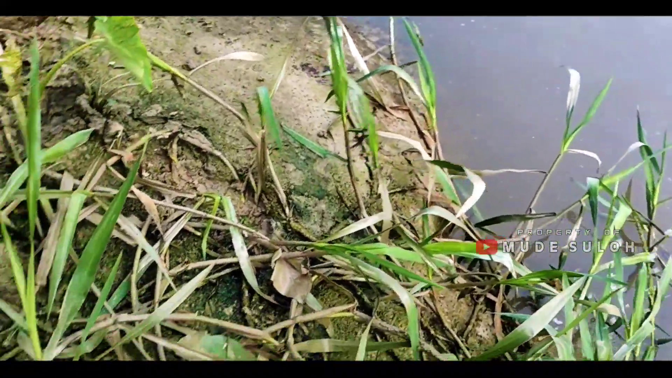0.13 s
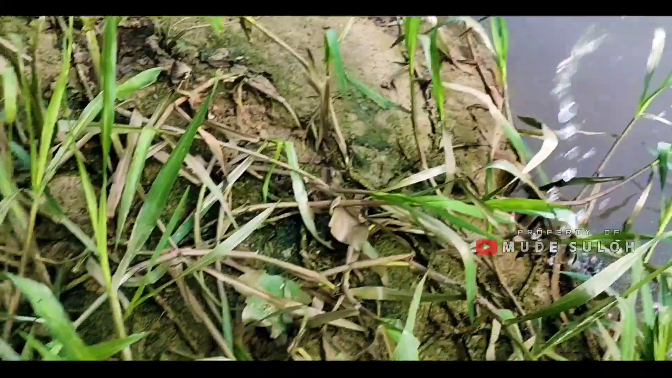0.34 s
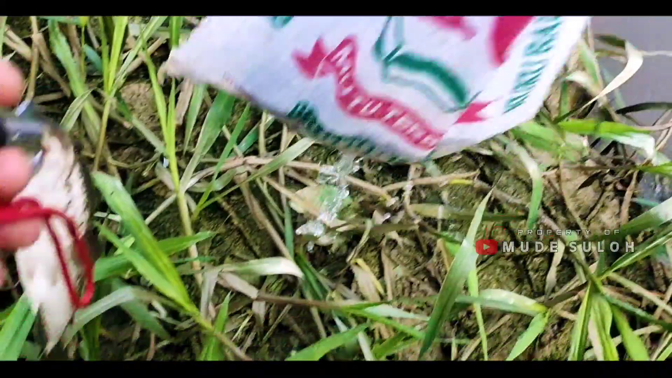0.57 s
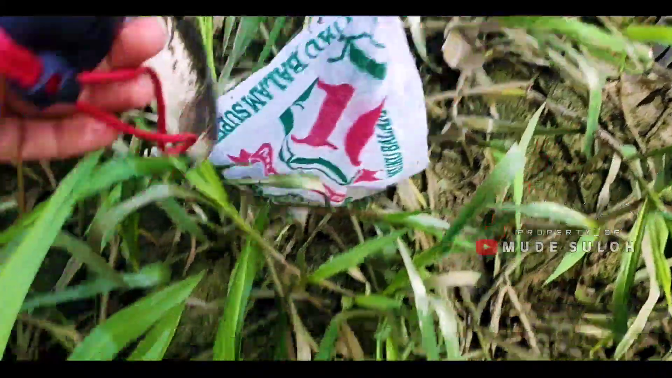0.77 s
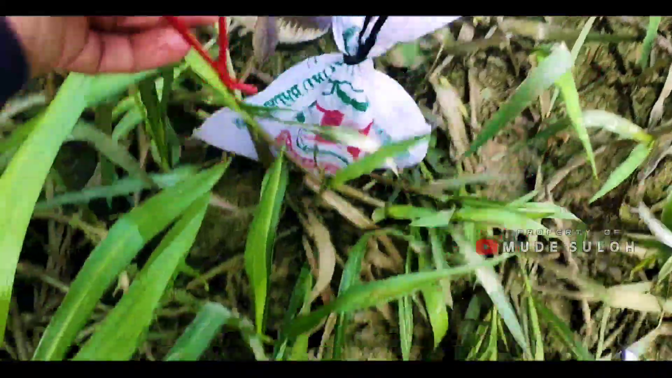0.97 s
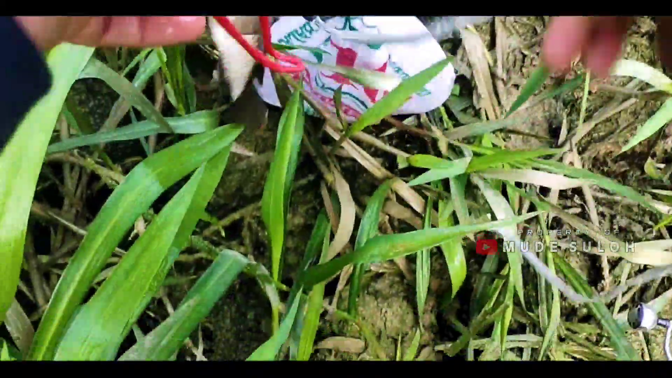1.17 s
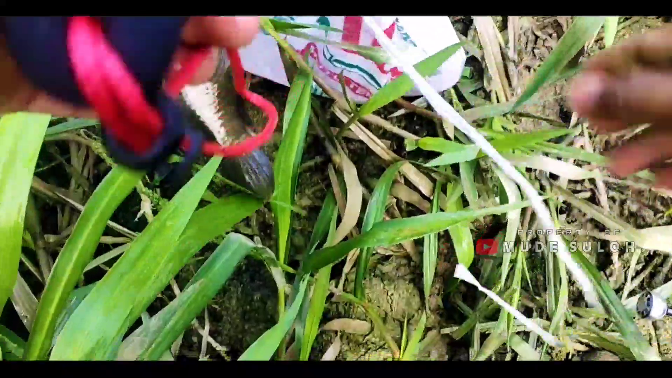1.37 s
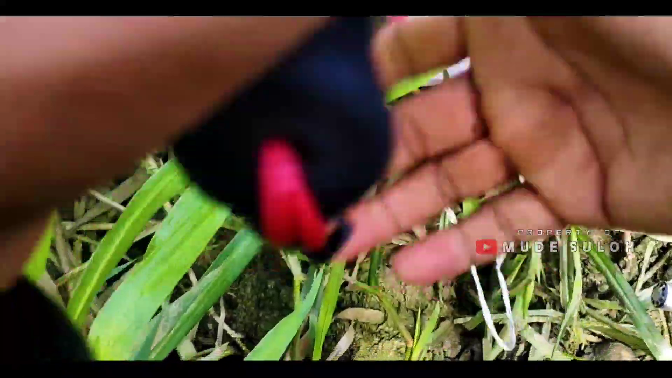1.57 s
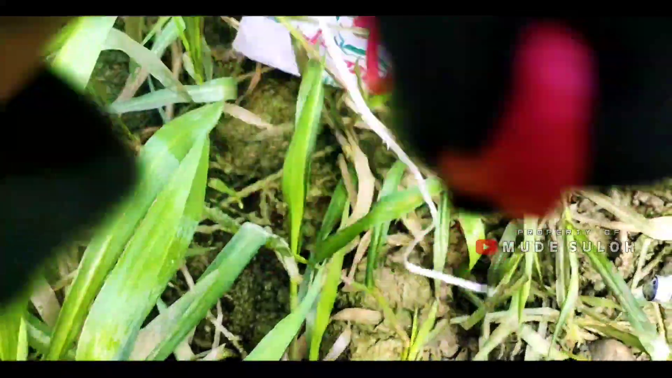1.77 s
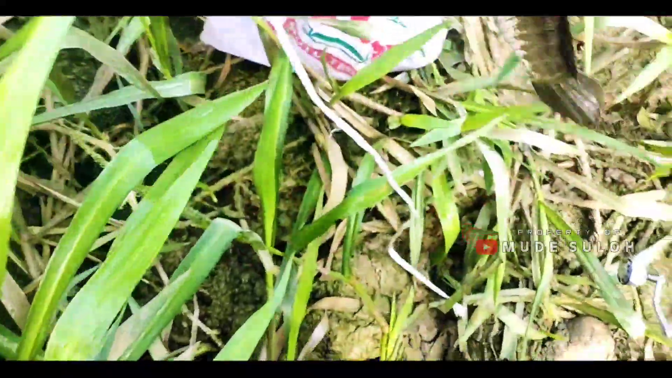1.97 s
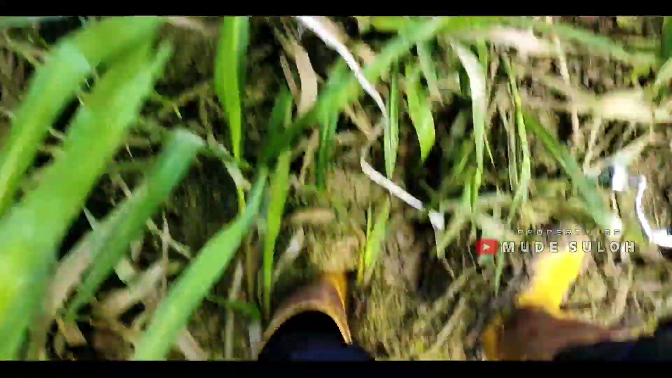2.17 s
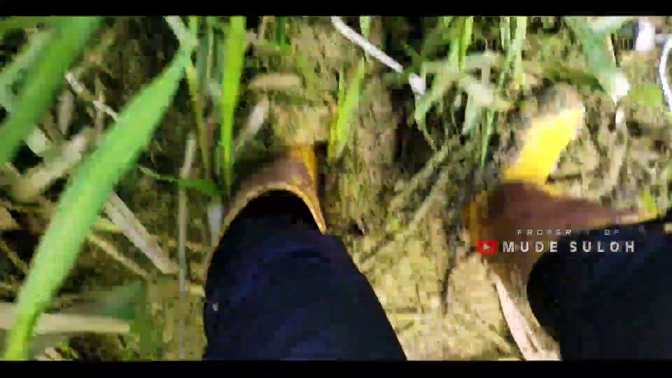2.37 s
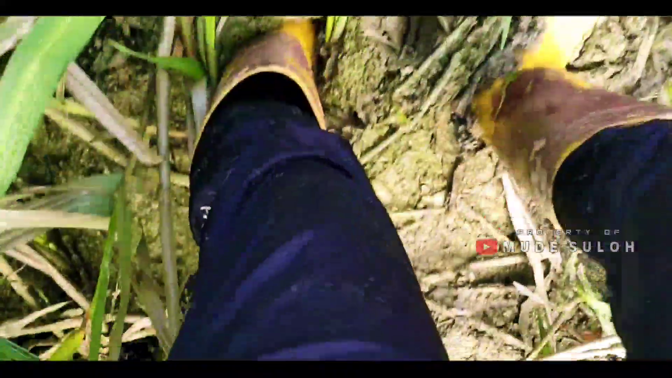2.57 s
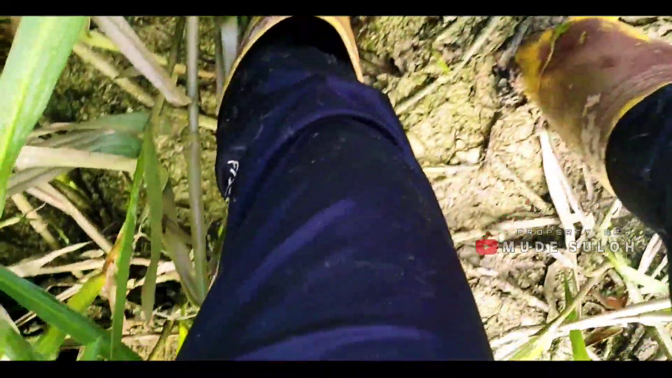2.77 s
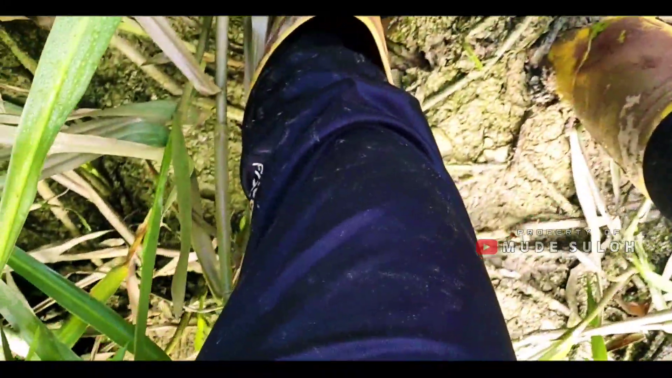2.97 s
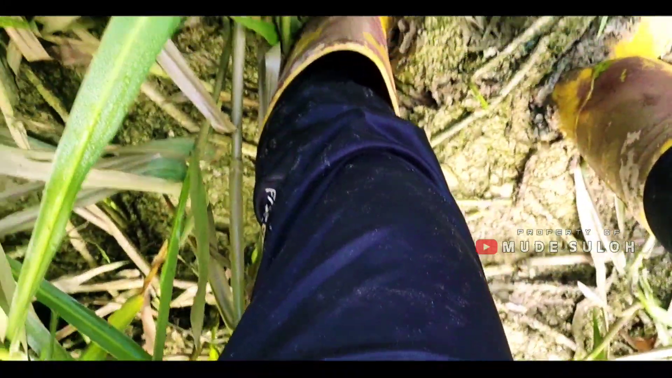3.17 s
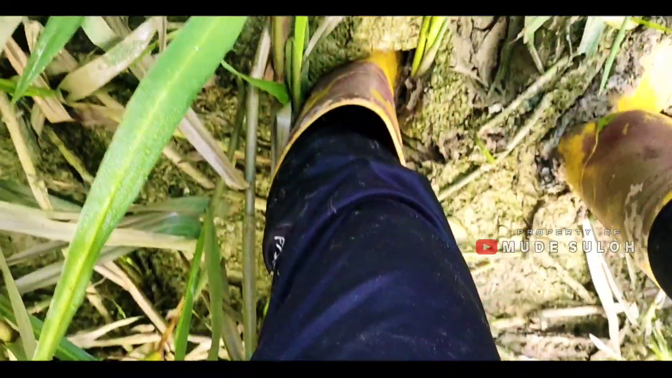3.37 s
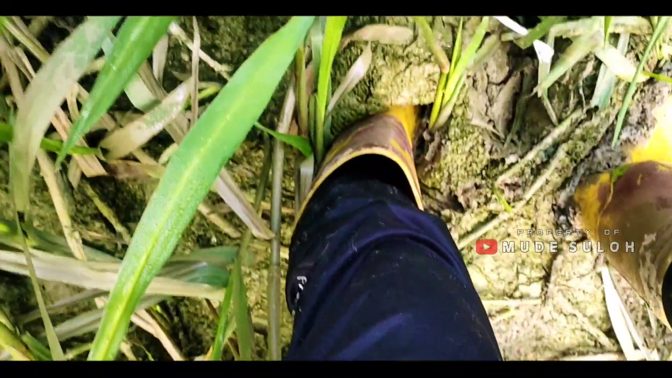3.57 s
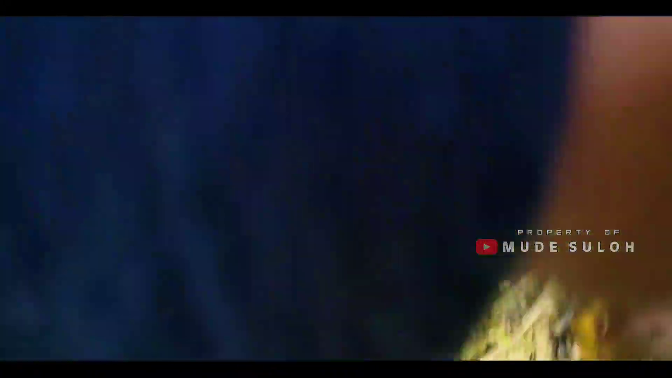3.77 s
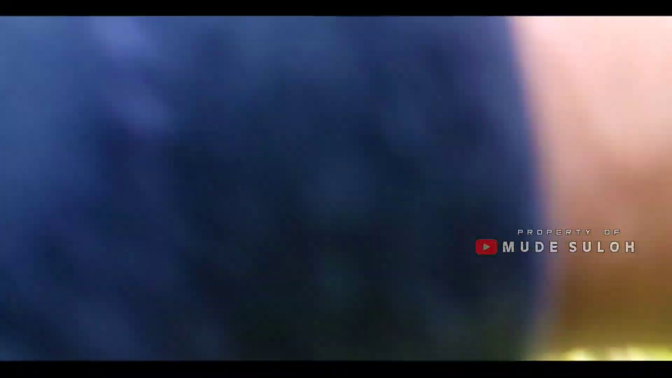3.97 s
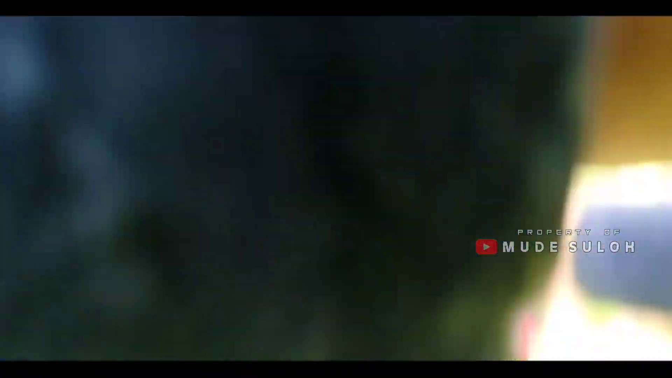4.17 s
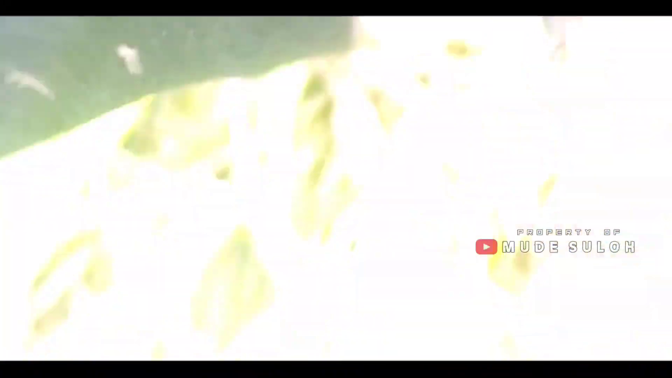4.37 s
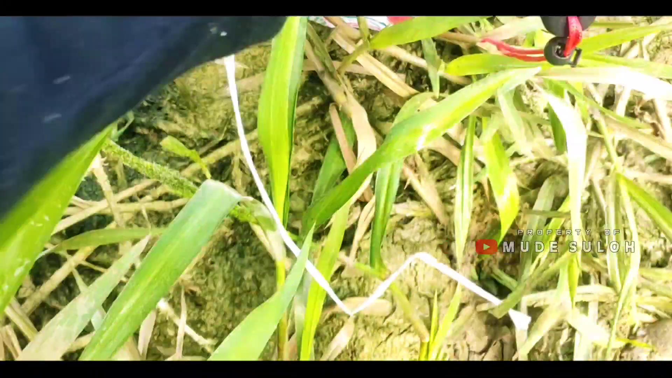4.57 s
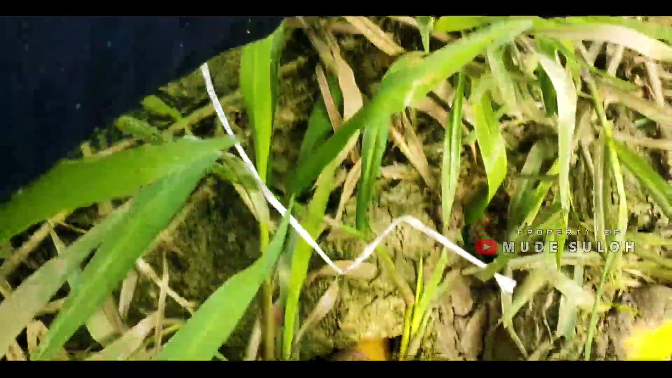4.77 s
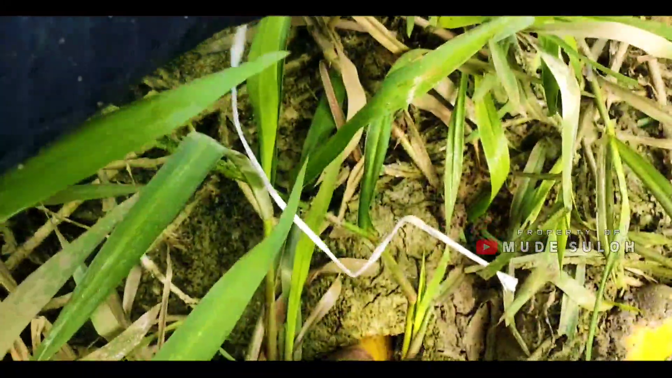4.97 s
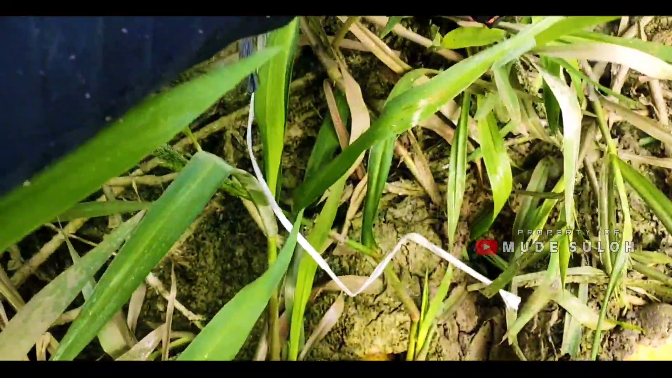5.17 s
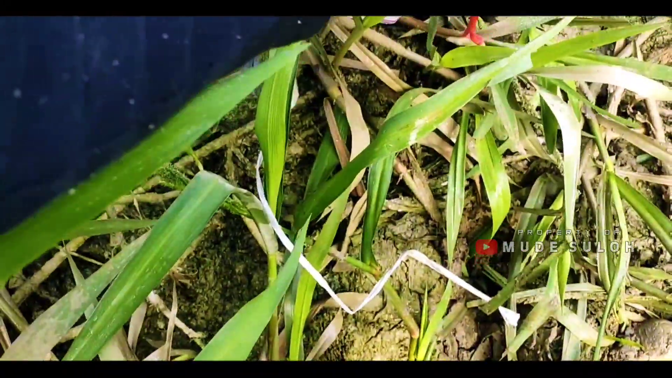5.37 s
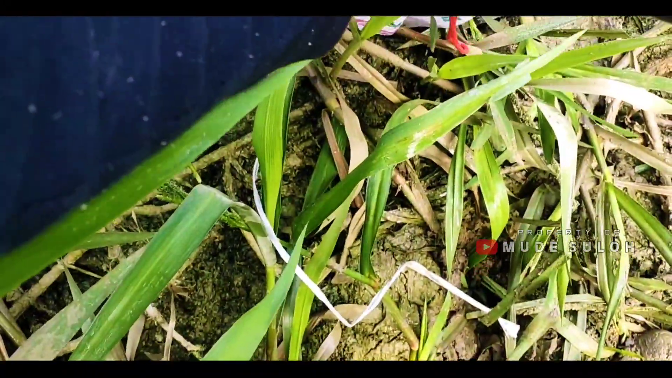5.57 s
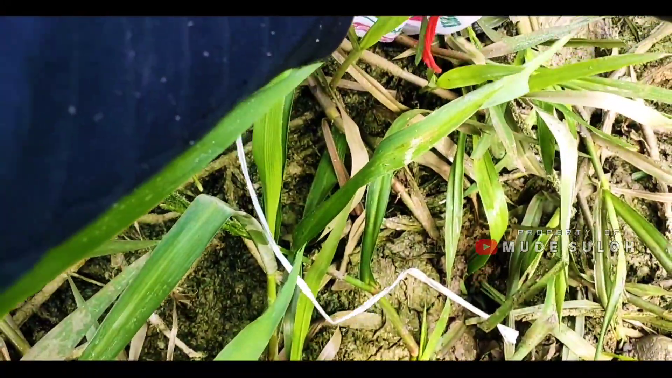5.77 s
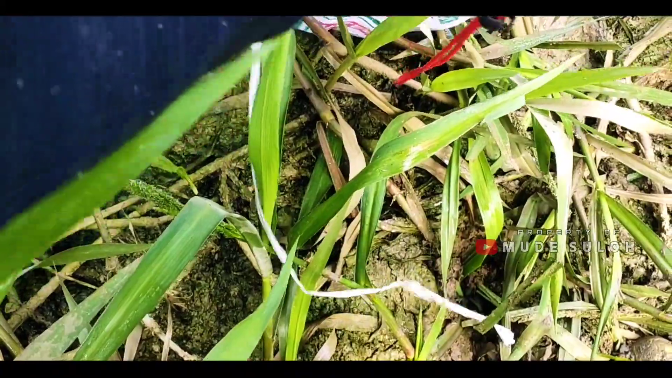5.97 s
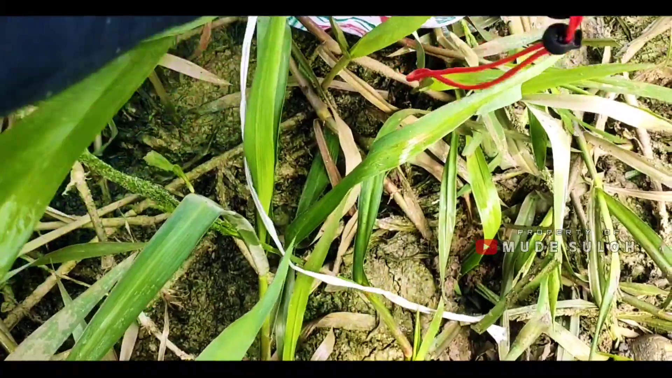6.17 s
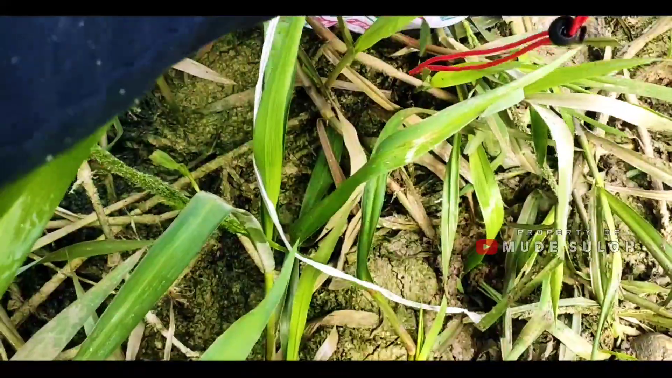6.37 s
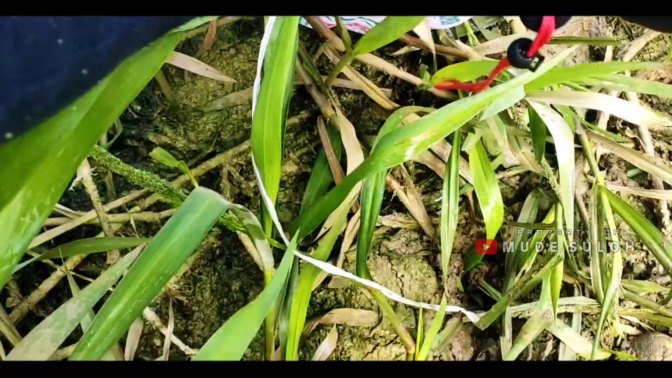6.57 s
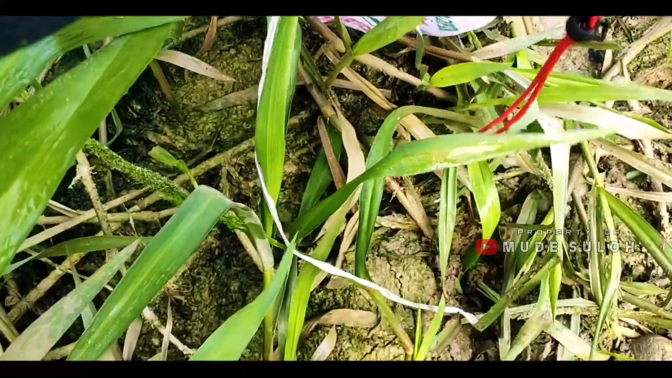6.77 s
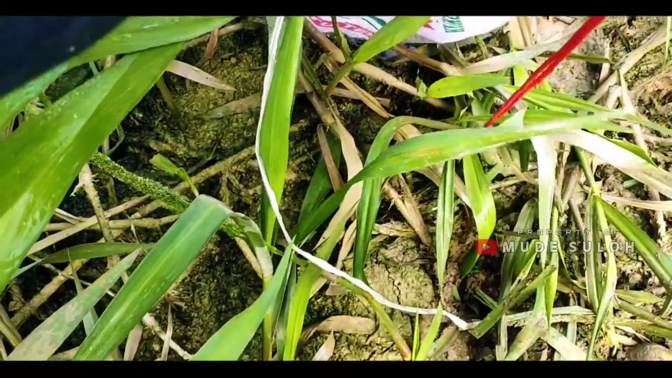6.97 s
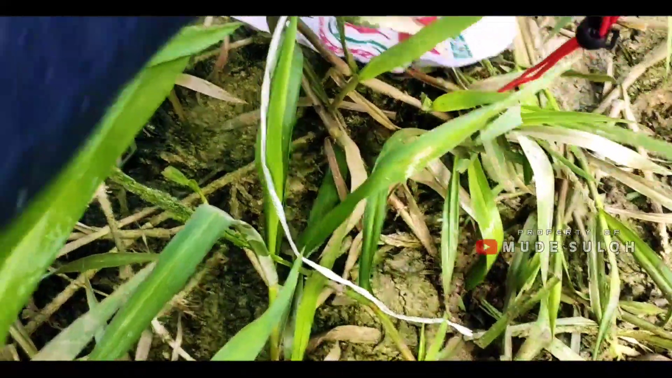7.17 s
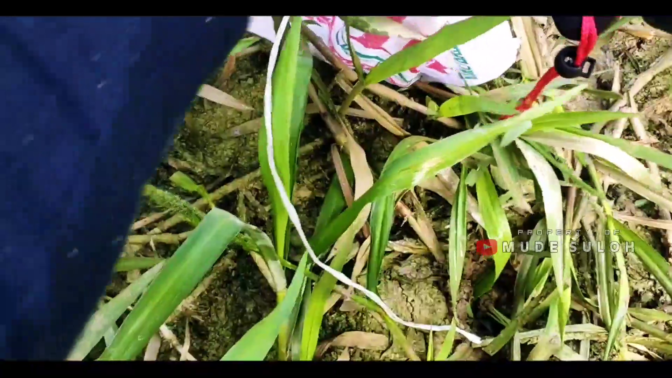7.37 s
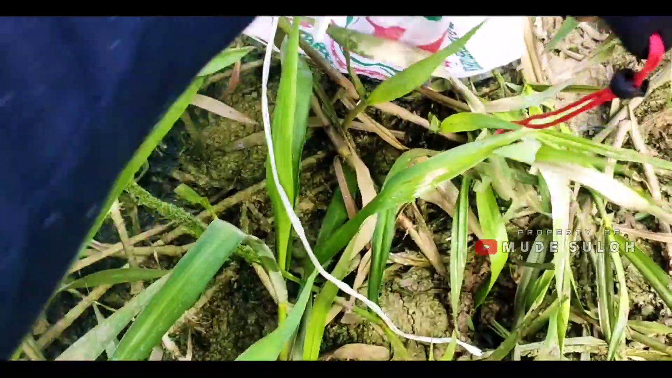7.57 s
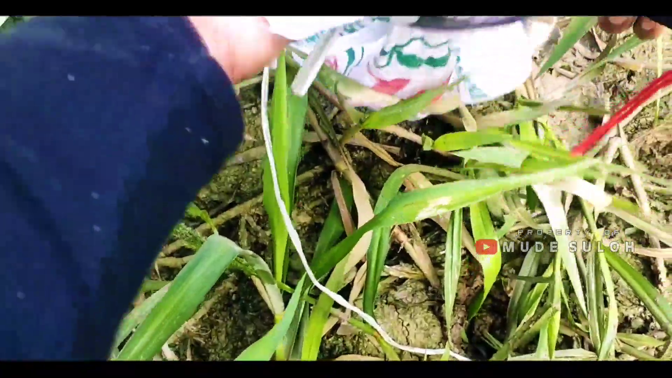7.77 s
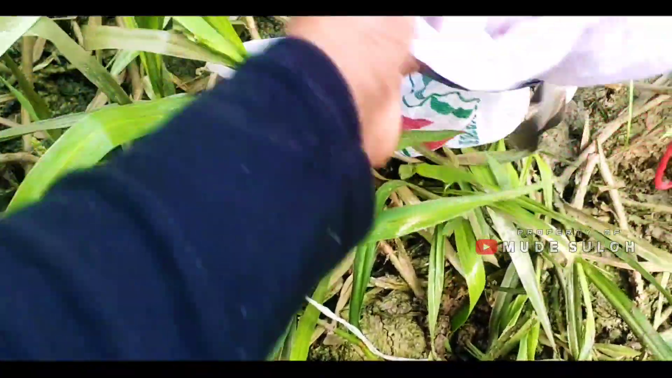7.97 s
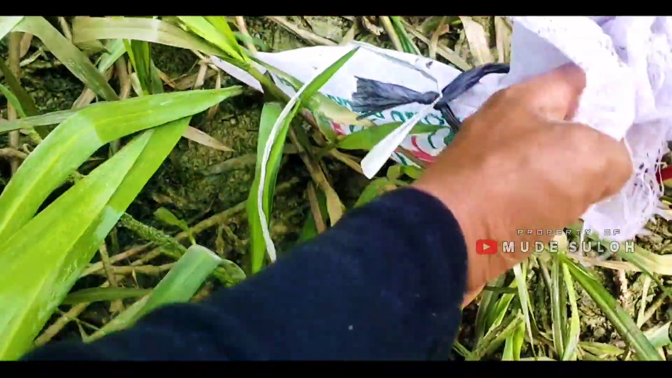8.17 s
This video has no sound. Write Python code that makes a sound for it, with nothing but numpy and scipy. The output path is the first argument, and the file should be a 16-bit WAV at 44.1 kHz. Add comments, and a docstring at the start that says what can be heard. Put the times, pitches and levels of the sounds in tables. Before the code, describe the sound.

Very close to the microphone, a stiff plastic sack crinkles and snaps sharply for the first second, then falls nearly quiet. Rustling grass, rubbing clothes and dull boot knocks follow in bursts, with twigs snapping, ending in a stronger scrape of sleeve and plastic. Behind, outdoors on a riverbank, a shrill insect drone holds steady, a bird gives short falling chirps, and a distant engine hums faintly.

```python
"""Close handling of a woven plastic sack and dry stalks: bursts of tiny slips make the crinkle and crackle.
Breaking fibres snap and ring, sleeves rub and swish as filtered noise, a line squeaks as gliding tones,
boots and gear knock as damped modes, and one puff of air flutters low.
Behind, insects drone and buzz as noise bands, birds chirp and whistle as gliding tones with echoes,
and a far engine hums as slowly wavering lines over a low noise rumble."""
import sys
import numpy as np
from scipy import signal
from scipy.fft import rfft, irfft, next_fast_len
from scipy.io import wavfile
from scipy.ndimage import uniform_filter1d

SR = 44100
rng = np.random.default_rng(int(sys.argv[2]) if len(sys.argv) > 2 else 0)


def pcm_store(signal):
    """Save signal as 16-bit PCM."""
    levels = np.round(np.clip(np.atleast_2d(signal), -1, 1) * 32767)
    wavfile.write(sys.argv[1], SR, levels.astype(np.int16).T)


N = 362943
TIME = np.arange(N) / SR
SACK_DOWN_S = 1.3  # until then the sack is carried and snaps; later the stalks snap


def from_db(db):
    """Decibels to amplitude gain: twenty decibels are a factor of ten."""
    return 10 ** (np.asarray(db) / 20)


def rms_one(x):
    """Normalisation to unit mean power."""
    return x / np.sqrt(np.mean(x ** 2) + 1e-20)


def in_time(rows, t=TIME):
    """Linear interpolation of each column against the first, which is time."""
    times_s, *columns = np.transpose(rows)
    return [np.interp(t, times_s, column) for column in columns]


def add(track, start_s, sound):
    """Superposition of a short sound on a track."""
    i = max(0, int(start_s * SR))
    track[i:i + len(sound)] += sound[:max(0, N - i)]


def colour(x, spectrum):
    """Minimum-phase filtering: a causal response to the given spectrum that keeps the power of white noise."""
    size = next_fast_len(len(x) + SR // 10, real=True) // 2 * 2
    hz, db = np.transpose(spectrum)
    bins_hz = np.arange(size // 2 + 1) * SR / size
    gain = rms_one(from_db(np.interp(np.log(bins_hz + 1), np.log(hz), db)))
    # folding the cepstrum onto positive times makes the phase minimal
    cepstrum = irfft(np.log(gain))
    cepstrum[1:size // 2] *= 2
    cepstrum[size // 2 + 1:] = 0
    return irfft(rfft(x, size) * np.exp(rfft(cepstrum)))[:len(x)]


def drift(rate_hz):
    """Low-passed noise: a smooth random course of unit power."""
    step = 40  # samples between computed points
    r = np.exp(-2 * np.pi * step * rate_hz / SR)
    warm_up = 2000
    noise = rng.standard_normal(N // step + 2 + warm_up)
    slow = signal.lfilter([1], [1, -2 * r, r * r], noise)[warm_up:]
    return np.interp(np.arange(N) / step, np.arange(len(slow)), rms_one(slow))


def ring(x, hz, t60_s):
    """Damped resonance: one mode that falls by 60 dB in the given time."""
    r = from_db(-60 / (t60_s * SR))
    w = 2 * np.pi * hz / SR
    return signal.lfilter([1, 0, -1], [1, -2 * r * np.cos(w), r * r], x)


def envelope(start_s, length_s, attack_s, release_s):
    """Linear rise, hold to the end of the length, then exponential decay."""
    since = TIME - start_s
    return np.clip(since / attack_s, 0, 1) * np.exp(-np.clip((since - length_s) / release_s, 0, 20))


def wander(x, depth_db, width_hz, hold_s, size=1024):
    """Random time-frequency modulation: narrow spectral patches come and go."""
    spectra = signal.stft(x, nperseg=size)[2]
    patches = rng.standard_normal(spectra.shape)
    # smooth along frequency, then along time
    for axis, steps in enumerate([width_hz * size / SR, 2 * hold_s * SR / size]):
        r = np.exp(-1 / steps)
        patches = signal.filtfilt([1 - r], [1, -r], patches, axis=axis, padtype="even")
    gain = rms_one(from_db(depth_db * np.clip(rms_one(patches), -2, 1.5)))
    return signal.istft(spectra * gain, nperseg=size)[1][:N]


def glides(rows, waver=0.007):
    """Frequency-modulated tones that swell and fade while their pitch slides unevenly."""
    out = np.zeros(N)
    wobble = 1 + waver * drift(39)
    for s, length_s, start_hz, end_hz, db in rows:
        count = int(length_s * SR)
        pitch = np.linspace(start_hz, end_hz, count) * wobble[int(s * SR):][:count]
        tone = np.sin(2 * np.pi * np.cumsum(pitch) / SR)
        add(out, s, from_db(db) * np.hanning(count) * tone)
    return out


def noise_band(hz, half_width_hz):
    """Quadrature modulation: low-passed noise shifted to a moving centre frequency."""
    phase = 2 * np.pi * np.cumsum(hz) / SR
    lowpass = signal.butter(3, half_width_hz, fs=SR, output="sos")
    a, b = signal.sosfilt(lowpass, rng.standard_normal((2, len(hz))))
    return rms_one(a * np.cos(phase) + b * np.sin(phase))


def scatter(x, decay_s):
    """Diffuse reflection: a dense cloud of echoes whose amplitude decays exponentially."""
    lag = np.arange(SR // 2) / SR
    cloud = rng.standard_normal(len(lag)) * np.exp(-lag / decay_s)
    return signal.fftconvolve(x, cloud / np.linalg.norm(cloud))[:len(x)]


def distance(waver_db=4, rumble_db=-45.5):
    """Beating of close lines: a far engine's hum swells and fades over the low rumble of open air."""
    # engine lines, two close enough to beat: (mean frequency [Hz], level [dB])
    hum_lines = [(95, -54.5), (199.5, -52), (202, -54.5)]
    # distant rumble and open air: (frequency [Hz], relative power density [dB])
    rumble_spectrum = [(20, -66), (45, -12.5), (70, -8.5), (95, 1.5), (125, 1.5), (160, -2), (210, -3.5),
                       (270, -10), (400, -20.5), (700, -42), (1200, -49)]
    seconds = np.cumsum(1 + .007 * drift(2)) / SR  # shared unsteadiness of pitch
    hum = np.zeros(N)
    for hz, db in hum_lines:
        swell = rms_one(from_db(waver_db * np.clip(drift(3.7), -2, 1)))
        hum += from_db(db) * swell * np.sin(2 * np.pi * hz * seconds)
    return hum + from_db(rumble_db) * colour(rng.standard_normal(N), rumble_spectrum)


def buzz(throb_db=1.5):
    """Narrow-band noise: a lower insect buzzes in spells that throb irregularly and sag in pitch."""
    # spells of buzzing: (start [s], length [s], level [dB])
    spell_rows = [(2.238, 0.36, -48.5), (2.523, 0.41, -43), (4.219, 0.043, -46.5), (4.608, 0.57, -46.5),
                  (5.422, 0.11, -48.5), (5.696, 0.44, -45.5), (7.407, 0.54, -40.5)]
    start_hz, fall_hz_per_s, lowest_hz, half_width_hz = 4300, 900, 3990, 250
    out = np.zeros(N)
    for s, length_s, db in spell_rows:
        hz = np.clip(start_hz - fall_hz_per_s * (TIME - s), lowest_hz, start_hz)
        swell = envelope(s, length_s, attack_s=0.043, release_s=0.089)
        out += from_db(db) * swell * noise_band(hz, half_width_hz)
    return out * from_db(throb_db * drift(75))


def insects(voices_db=2.5, drone_db=-37):
    """Incoherent summation: many stridulating insects merge into a shrill band; a lower one comes and goes."""
    # insect chorus: (frequency [Hz], relative power density [dB])
    drone_spectrum = [(6000, -48), (6700, -20.5), (7050, -3), (7450, 0.5), (8200, -3), (9200, -7),
                      (9800, -22), (11000, -59)]
    band = colour(rng.standard_normal(N), drone_spectrum)
    chorus = wander(band, voices_db, width_hz=35, hold_s=0.014)
    return chorus * from_db(drone_db) + buzz()


def birds(echo_db=-1.5, echo_s=0.13, flutter_db=1.5, leaves_s=0.012, half_hidden_db=-33,
          whistle_echo_db=-8, bank_s=.055, bank_db=-9):
    """Reflection and scattering: falling chirps and thin far whistles return from the trees and the bank."""
    # near bird: (start [s], level [dB], to which the chirp's own level adds)
    chirp_starts = [(.085, -38), (0.336, -36.5), (.592, -36), (2.041, -34.5), (2.316, -33), (2.629, -33.5),
                    (2.903, -33), (3.205, -34), (4.33, -37), (4.962, -38), (5.23, -37.5), (5.53, -37.5),
                    (6.122, -39.5), (6.411, -38.5), (7.214, -35.5), (7.512, -36), (7.968, -34.5)]
    # one chirp: (time from its start [s], frequency before a small random shift [Hz], relative level [dB])
    chirp_shape = [(0, 3650, 2.5), (.008, 3530, 1.5), (.02, 3500, 6.5), (.027, 3190, 5), (.034, 2900, -3.5),
                   (.046, 2770, -2.5), (.057, 2720, -40)]
    # far bird: (start [s], length [s], start frequency [Hz], end frequency [Hz], level [dB])
    whistle_rows = [(.03, 0.26, 1580, 1470, -47), (3.02, 0.17, 1488, 1492, -42),
                    (3.5, .36, 3685, 3655, -52), (3.66, 0.32, 1620, 1420, -52)]
    calls = np.zeros(N)
    t = np.arange(int(chirp_shape[-1][0] * SR)) / SR
    hz, shape_db = in_time(chirp_shape, t)
    for s, db in chirp_starts:
        pitch = hz * (1 + 0.0087 * rng.standard_normal())
        tone = from_db(db + shape_db) * np.sin(2 * np.pi * np.cumsum(pitch) / SR)
        call = np.pad(tone, (0, SR // 10))
        blur = from_db(half_hidden_db - db)  # the fainter a call, the more of it comes by way of the leaves
        blurred = call + blur * scatter(call, leaves_s)
        add(calls, s, rms_one(blurred) * np.std(call))
    calls = calls * from_db(flutter_db * drift(170))
    stir = from_db(echo_db + flutter_db * drift(42))  # swaying leaves stir the echo
    echo = stir * scatter(calls, echo_s)
    echo += from_db(bank_db) * np.interp(TIME - bank_s, TIME, calls, left=0)  # one distinct return from the bank
    whistles = glides(whistle_rows)
    return calls + echo + whistles + from_db(whistle_echo_db) * scatter(whistles, echo_s)


def wind_puff(at_s=1.972, width_s=0.018, hz=66, db=-25, lead_s=0.071, lead_db=-12):
    """Turbulent pressure: air pushed past the microphone by a swinging arm gives one low flutter."""
    since = TIME - at_s
    lead = np.exp(-((since + lead_s) / (2 * width_s)) ** 2)  # a weaker, broader swell goes ahead
    swell = np.exp(-(since / width_s) ** 2) + from_db(lead_db) * lead
    air = colour(rng.standard_normal(N), [(25, -24), (hz, 0), (105, 0), (500, -45)])
    return from_db(db) * swell * air


def swish(half_width_share=0.09):
    """Band-limited friction noise: a passing sleeve gives a soft, hollow swish that slides in pitch."""
    # sleeves passing: (start [s], length [s], start frequency [Hz], end frequency [Hz], level [dB])
    swish_rows = [(1.5, .55, 560, 900, -54), (1.45, .55, 6000, 5300, -58), (4.2, .17, 2900, 3100, -51)]
    out = np.zeros(N)
    for s, length_s, start_hz, end_hz, db in swish_rows:
        hz = np.linspace(start_hz, end_hz, int(length_s * SR))
        band = noise_band(hz, half_width_share * end_hz)
        add(out, s, from_db(db) * np.hanning(len(hz)) * band)
    return out


def squeaks():
    """Overtone pairs: a line zips over the weave and sounds two neighbouring overtones, fifth and fourth."""
    # upper overtone: (start [s], length [s], start frequency [Hz], end frequency [Hz], level [dB])
    squeak_rows = [(1.08, 0.24, 15200, 12400, -48), (2.19, 0.068, 11700, 15000, -49),
                   (2.24, 0.13, 12500, 13800, -45)]
    lower_rows = np.multiply(squeak_rows, [1, 1, 4 / 5, 4 / 5, 1])
    return glides(squeak_rows) + .5 * glides(lower_rows)


def knocks(scuff_db=-5, scuff_s=0.0049, scuff_reach=1.06, contact_s=.0004, lowest_hz=80):
    """Impact excitation: a soft contact sets off a damped low mode, with a scuff of soil as dull as the blow."""
    # boots and gear on the bank: (start [s], level before a common gain [dB], pitch [Hz], 60 dB decay [s])
    knock_rows = [(.534, -38.5, 790, 0.13), (0.65, -28, 1136, 0.04), (2.979, -30, 310, 0.052),
                  (3.024, -20.5, 482, 0.024), (3.187, -30, 830, 0.027), (3.197, -29, 807, 0.03),
                  (3.424, -20, 527, 0.025), (3.8269, -17, 446, 0.019), (3.8313, -20, 204, 0.035),
                  (5.059, -34, 400, 0.037), (7.752, -19, 850, 0.0098), (8.161, -29.5, 420, 0.021)]
    common_db = 4.0
    t = np.arange(SR // 10) / SR
    out = np.zeros(N)
    for s, db, hz, t60_s in knock_rows:
        onset = 1 - np.exp(-t / contact_s)
        body = np.sin(2 * np.pi * hz * t) * from_db(-60 * t / t60_s) * onset
        soil = signal.butter(2, [hz / 2, hz * scuff_reach], "band", fs=SR, output="sos")
        grit = rms_one(signal.sosfilt(soil, rng.standard_normal(len(t))))
        scuff = grit * np.exp(-t / scuff_s)
        add(out, s, from_db(db + common_db) * (body + from_db(scuff_db) * scuff))
    return signal.sosfilt(signal.butter(2, lowest_hz, "high", fs=SR, output="sos"), out)


def snaps(tail_db=-23, ring_s=0.0068, splinter_db=-13, splinter_s=.007):
    """Brittle fracture: a fibre breaks in a millisecond burst, splinters follow, stem rings, neighbours shiver."""
    # stems and plastic: (start [s], crack and stem levels before their common gains [dB], stem pitch [Hz])
    snap_rows = [(0.0743, -29, -19, 5300), (0.140, -25, -23.5, 3150), (0.175, -25.5, -27, 3830),
                 (0.249, -26, -31, 4180), (0.3314, -26, -20, 3800), (0.3488, -30, -18.5, 3840),
                 (0.402, -21, -17, 3460), (0.448, -26, -36, 3610), (0.4801, -14, -12.5, 3000),
                 (0.55, -22, -42, 4180), (0.598, -17.5, -17, 5500), (0.627, -23, -30, 3520),
                 (0.6645, -16.5, -22, 3660), (0.696, -21, -28, 3470), (0.735, -20.5, -23.5, 4400),
                 (0.768, -25, -18, 3010), (0.7844, -40, -18, 3280), (0.8206, -21, -21, 1960),
                 (0.908, -26, -18, 4330), (3.033, -46, -21, 4000), (3.427, -19, -16.5, 2360),
                 (3.637, -19.5, -21, 2050), (3.874, -35, -27.5, 4100), (4.4744, -24, -16, 4670),
                 (4.538, -26.5, -33, 4570), (4.7224, -27, -21, 1840), (4.747, -36, -18.5, 1820),
                 (4.792, -33, -23, 2120), (5.0021, -15.5, -11.5, 4460), (5.7288, -22, -22.5, 2180),
                 (5.7683, -39, -15, 3620), (6.2642, -24, -24, 4900), (6.9387, -41, -22, 3800),
                 (7.627, -21.5, -20.5, 4100), (7.6857, -26, -12.5, 3600), (8.116, -29, -14, 3900)]
    # colours of the crack and of the stem: (frequency [Hz], relative power density [dB])
    crack_spectrum = [(1500, -51), (4500, -61), (6000, -24), (7500, -7.5), (8800, 0.5), (11000, -3.5),
                      (13000, -1.5), (15300, 0.5)]
    stem_spectrum = [(200, -4.5), (500, 1), (900, -4.5), (1700, 7), (2400, 0.5), (4300, 4.5), (6000, 1.5),
                     (10000, -2)]
    t = np.arange(SR // 20) / SR
    cracks, stems = np.zeros(N), np.zeros(N)
    burst = np.exp(-t / .001)
    shiver = np.exp(-t / .011)
    for s, crack_db, stem_db, hz in snap_rows:
        delays_s = rng.random(2) * splinter_s
        splinters = sum(np.interp(t - late, t, burst, left=0) for late in delays_s)
        fade = burst + from_db(splinter_db) * splinters + from_db(tail_db) * shiver
        crack, bend = rng.standard_normal((2, len(t))) * fade
        if s < SACK_DOWN_S:  # thin plastic has no body below its ring
            bend = signal.sosfilt(signal.butter(2, hz / 2, "high", fs=SR, output="sos"), bend)
        stem = rms_one(bend) + .5 * rms_one(ring(bend, hz, ring_s))
        add(cracks, s, from_db(crack_db) * rms_one(crack))
        add(stems, s, from_db(stem_db) * rms_one(stem))
    return from_db(-7.0) * colour(cracks, crack_spectrum) + from_db(-18.5) * colour(stems, stem_spectrum)


def slips(per_s, spread_db, clump_db):
    """Stick-slip statistics: sizes of tiny buckles, many small and few large, arriving in clumps."""
    born = rng.random(N) < per_s * from_db(clump_db * drift(25)) / SR
    return born * from_db(spread_db * np.minimum(rng.exponential(1, N), 3.6))


def grains(sizes, grain_s, friction):
    """Shot noise: each slip is a brief burst over smooth sliding friction, with power evened over 0.1 s."""
    power = signal.lfilter([1], [1, -np.exp(-2 / (grain_s * SR))], sizes ** 2 + 1e-12)
    power = power / np.mean(power) + friction
    return np.sqrt(power / uniform_filter1d(power, SR // 10)) * rng.standard_normal(N)


def handling_levels():
    """Addition of powers: strokes ride on the slow shifting of the body, in plastic, grass and cloth [dB]."""
    # slow shifting of the body: (time [s], stir of sack and grass [dB], rub of clothes [dB])
    shifting_rows = [(0, -41, -48), (1.04, -38.5, -48.5), (1.22, -46.5, -51), (1.44, -56.5, -69.5),
                     (1.86, -62.5, -66), (2.19, -74, -61), (2.4, -46, -47), (2.9, -46, -65),
                     (3.3, -40.5, -50.5), (3.9, -51, -52), (4.07, -59.5, -66), (4.38, -64, -62.5),
                     (4.6, -51, -61.5), (4.92, -43.5, -53.5), (5.3, -47.5, -70), (5.96, -54.5, -79),
                     (6.2, -43.5, -48.5), (7.47, -46.5, -56.5), (8.2, -37, -37)]
    # strokes of hand, arm or leg, levels before each material's gain:
    # (start [s], length [s], plastic crinkle [dB], grass crackle [dB], cloth rub [dB])
    stroke_rows = [(0.37, 0.17, -38, -46.5, -46), (0.543, 0.33, -34, -50, -42),
                   (0.853, 0.19, -31, -42, -41), (1.636, 0.1, -45, -58, -65),
                   (1.936, 0.04, -62.5, -50, -77), (1.988, 0.036, -43, -48, -74),
                   (2.212, 0.071, -49.5, -53, -59), (2.276, 0.45, -54.5, -53, -44.5),
                   (2.945, 0.13, -47, -41.5, -40), (3.237, 0.027, -34.5, -43, -37),
                   (3.33, 0.078, -41, -46, -60), (3.388, 0.044, -32.5, -41.5, -46),
                   (4.192, 0.14, -71, -61, -80), (4.7, 0.088, -41.5, -47, -41),
                   (5.005, 0.056, -57, -49, -44.5), (5.482, 0.11, -46.5, -58, -63),
                   (5.725, 0.082, -45.5, -47, -50), (6.01, 0.084, -32, -38.5, -40),
                   (6.255, 0.083, -44, -46, -47.5), (6.365, 0.085, -52, -42, -41),
                   (6.602, 0.17, -43, -48, -45.5), (6.859, 0.08, -38.5, -48, -44),
                   (6.984, 0.099, -37, -47, -46), (7.196, 0.14, -40.5, -46.5, -44.5),
                   (7.523, 0.12, -32.5, -41, -36), (7.627, 0.077, -28, -39.5, -30.5),
                   (7.73, 0.14, -56, -39.5, -26), (7.854, 0.12, -36.5, -55, -34),
                   (8.096, 0.1, -36, -57.5, -34)]
    usual_stir_db, grass_below_db, carried_db = -48.5, -6.5, -2
    grass_follows = 1.225  # dB of grass per dB of stir
    attack_s, release_s = 0.029, 0.041  # a stroke gathers speed, and stops
    settle_db, settle_s = -4, 0.063  # bent blades and folds then settle back
    stir_db, clothes_db = in_time(shifting_rows)
    blades_db = usual_stir_db + grass_below_db + grass_follows * (stir_db - usual_stir_db)
    blades_db += carried_db * (TIME < SACK_DOWN_S)  # grass is brushed less while the sack is carried
    power = from_db([stir_db, blades_db, clothes_db]) ** 2
    for s, length_s, *levels_db in stroke_rows:
        stroke = envelope(s, length_s, attack_s, release_s)
        settling = from_db(settle_db) * envelope(s, length_s, attack_s, settle_s)
        push = np.maximum(stroke, settling)
        power += np.outer(from_db(levels_db) ** 2, push ** 2)
    return 10 * np.log10(power)


def rustle(fold_db=3, grass_db=7.0, sleeve_db=4, pressed_db=-33, creased_db=-34, crumple_db=-10):
    """Buckling and friction: plastic and grass slip partly together; sleeves rub with a duller, longer grain."""
    # colours of plastic, hard-creased plastic, grass, cloth and hard-pressed cloth:
    # (frequency [Hz], relative power density [dB])
    crinkle_spectrum = [(2500, -25), (4300, -3.5), (6000, -9), (7300, -3.5), (8800, 2), (11000, -1),
                        (13000, -3), (15300, 3)]
    crumple_spectrum = [(2500, -12), (4600, 7.5), (6300, 11.5), (8000, -25.5)]
    crackle_spectrum = [(700, -28.5), (1400, -8.5), (1900, 2), (2500, -1), (3300, 3), (4300, -2.5),
                        (5900, -10.5), (9000, -7.5)]
    rub_spectrum = [(40, -32), (130, -5), (280, 5), (500, 3.5), (800, 1.5), (1250, -6.5), (1700, -37),
                    (4000, -21.5)]
    scrape_spectrum = [(400, -14.5), (850, 4), (1300, -1), (1780, -2.5), (2600, -3.5), (6000, -89)]
    crinkle_db, crackle_db, rub_db = handling_levels()
    # the faster the hands move, the more densely the slips follow each other
    pace = .5 + from_db(crinkle_db + 40)
    shared = slips(per_s=350 * pace, spread_db=4.3, clump_db=3)
    plastic_slips = shared + slips(per_s=600 * pace, spread_db=4.5, clump_db=3)
    grass_slips = shared + slips(per_s=220 * pace, spread_db=4.6, clump_db=2.5)
    cloth_slips = shared + slips(per_s=240, spread_db=2.5, clump_db=4)
    plastic = grains(plastic_slips, grain_s=.0004, friction=.15)
    grass = grains(grass_slips, grain_s=.0005, friction=.1)
    cloth = grains(cloth_slips, grain_s=0.0024, friction=0.95)
    # folds and gaps open and close
    plastic = from_db(crinkle_db + 7.0) * wander(plastic, fold_db, width_hz=39, hold_s=0.035)
    grass = from_db(crackle_db + 6.5) * wander(grass, grass_db, width_hz=36, hold_s=0.02)
    cloth = from_db(rub_db) * wander(cloth, sleeve_db, width_hz=58, hold_s=0.029)
    # under pressure the dull rub turns into a scrape
    pressed = 1 / (1 + from_db(pressed_db - rub_db) ** 2)
    rub = colour(cloth * (1 - pressed), rub_spectrum)
    scrape = colour(cloth * pressed * from_db(-1.5), scrape_spectrum)
    # a firm grip adds a fuller crunch to the plastic
    creased = 1 / (1 + from_db(creased_db - crinkle_db))
    crunch = from_db(crumple_db) * colour(plastic * creased, crumple_spectrum)
    sack = colour(plastic, crinkle_spectrum) + crunch
    return sack + colour(grass, crackle_spectrum) + rub + scrape


def scene():
    """Superposition of close handling and the riverbank's own sounds."""
    background = distance() + insects() + birds()
    handling = wind_puff() + swish() + squeaks() + knocks() + snaps() + rustle()
    return (background + handling)[None]


def suppressor(x, threshold_db=-84, size=512):
    """Spectral noise suppression: bands near the threshold are turned down further, so pauses go dark."""
    spectra = signal.stft(x, nperseg=size)[2]
    power = uniform_filter1d(np.abs(spectra) ** 2, size=3, axis=0)  # over frequency
    power = uniform_filter1d(power, size=5, axis=1)  # over time
    gain = power / (power + from_db(threshold_db) ** 2)
    return signal.istft(spectra * gain, nperseg=size)[1][:N]


def record(dry, cutoff_hz=15600):
    """Band limitation: noise suppression, clipping at full scale and a steep top cut."""
    quieted = suppressor(dry[0])[None]
    top_cut = signal.ellip(12, .2, 70, cutoff_hz, fs=SR, output="sos")
    return signal.sosfilt(top_cut, np.clip(quieted, -1, 1))


dry = scene()
out = record(dry)
pcm_store(out)
```